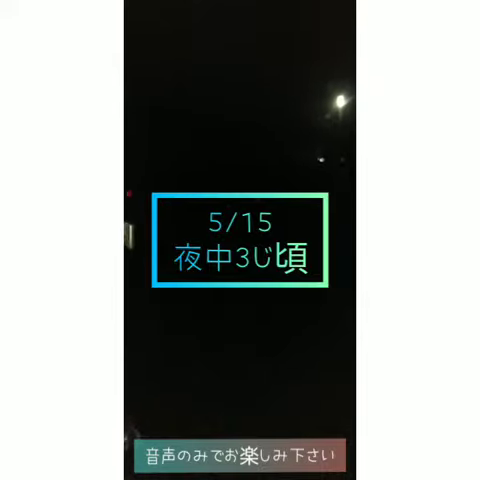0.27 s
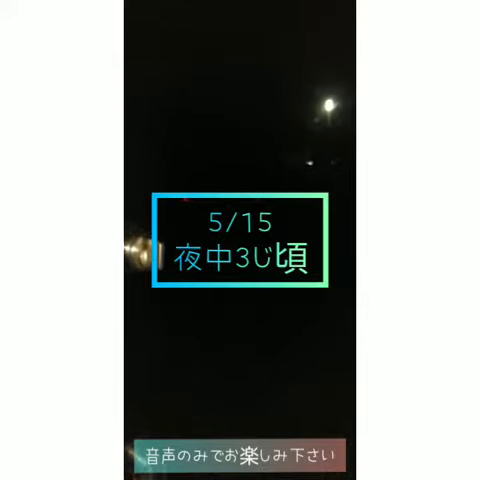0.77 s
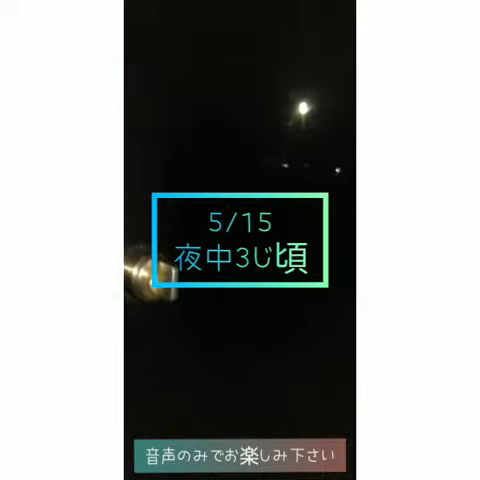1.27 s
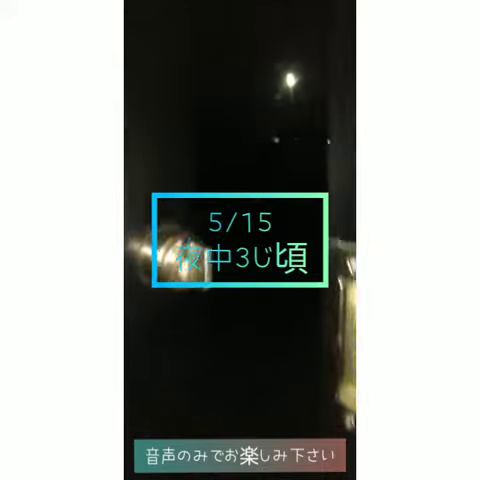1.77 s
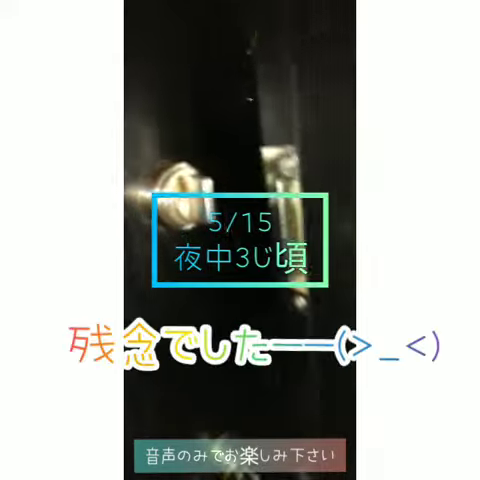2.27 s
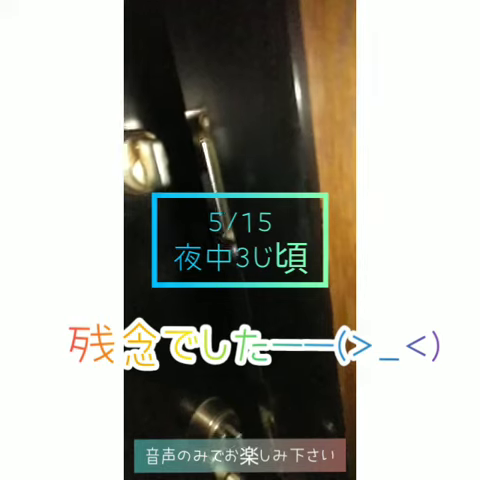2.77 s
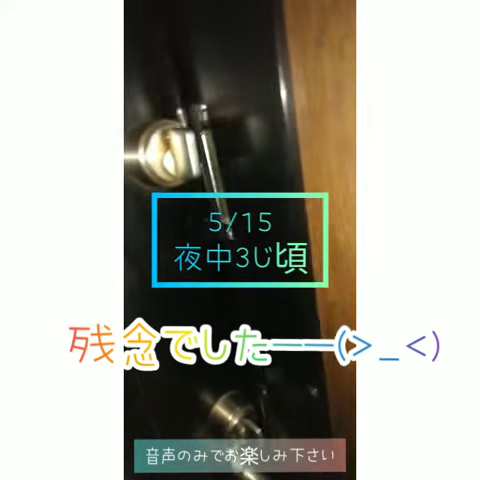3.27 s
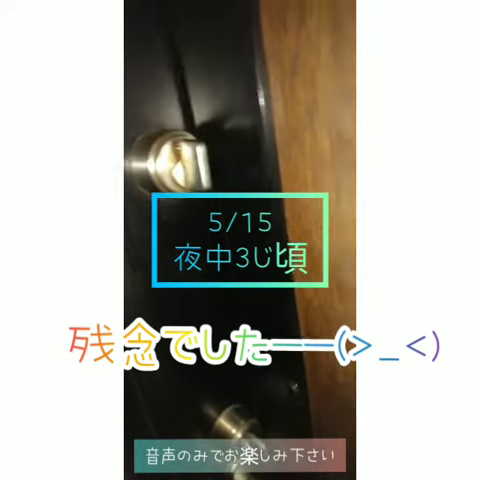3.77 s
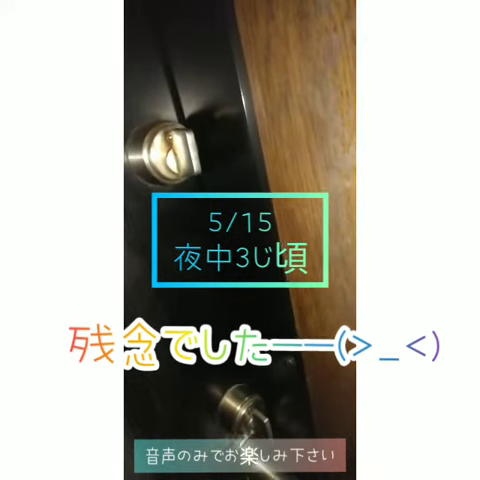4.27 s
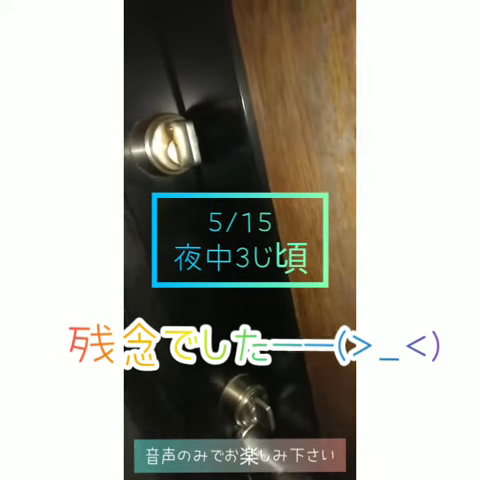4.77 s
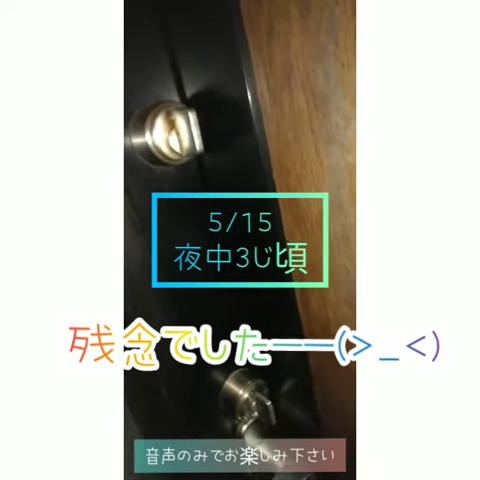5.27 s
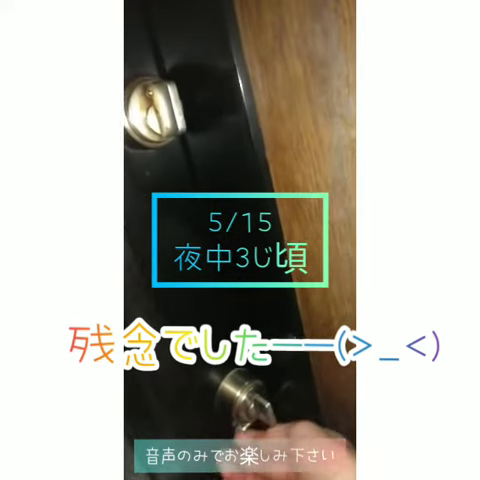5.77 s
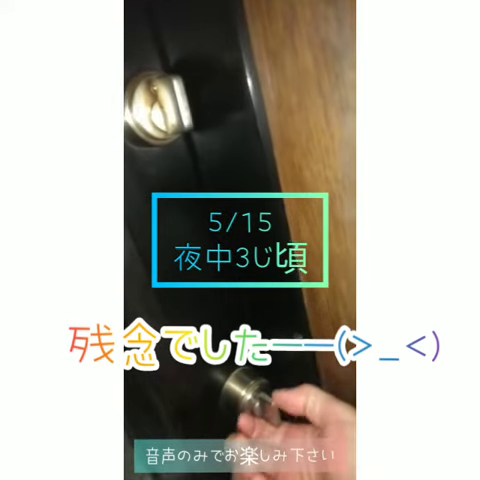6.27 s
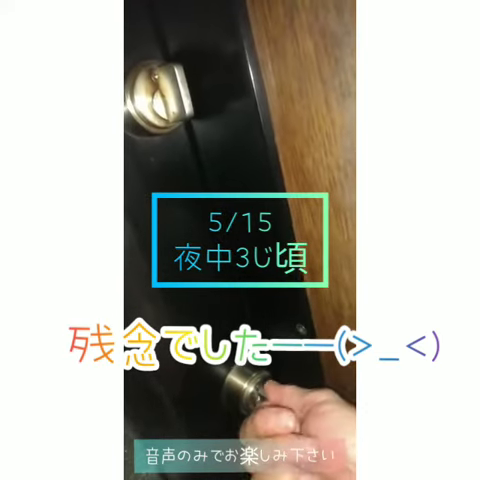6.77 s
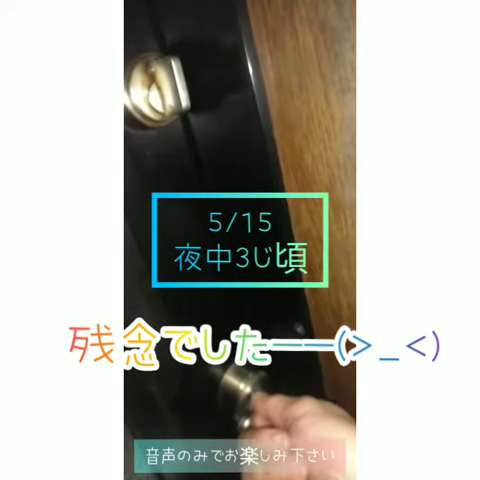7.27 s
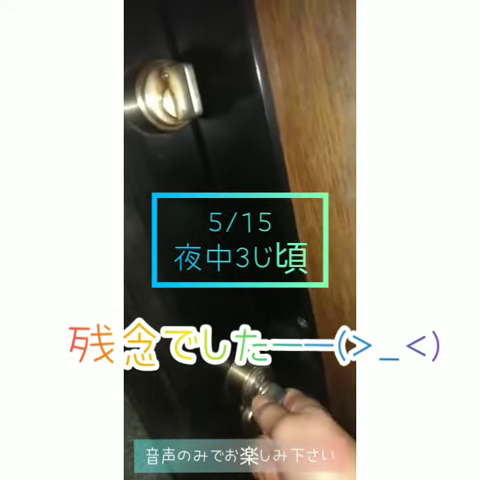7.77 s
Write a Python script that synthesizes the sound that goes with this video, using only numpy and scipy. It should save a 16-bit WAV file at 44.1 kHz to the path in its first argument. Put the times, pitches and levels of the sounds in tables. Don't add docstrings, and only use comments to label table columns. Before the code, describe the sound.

Quiet outdoor air, low rumble and thin microphone hiss fill a small hall at night, heard through a close phone. From about 0.6 to 0.9 s a swinging front door gives several light metallic snaps, with fainter ones at 1.3 and 1.5 s and a clearer latch click near 2.0 s, alongside a barely audible seal brush. The air slowly becomes muffled. After sparse tiny ticks, the leaf seats at 3.7 s with a low thud and metal clinks, then a bright latch click at 3.9 s. Lock clacks cluster around 4.5 s, with a heavier knock at 4.8 s, clicks at 5.4 and 5.7 s and a strong hollow clack at 5.9 s. Softer handling rubs and knocks continue through 6 to 7.3 s. A short thin squeak at 7.5 s precedes the sharpest metal snap at 7.7 s, then small ticks fade.

```python
import sys
import numpy as np
from scipy import signal
from scipy.fft import rfft, irfft, next_fast_len
from scipy.io import wavfile
from scipy.ndimage import uniform_filter1d, map_coordinates

SR = 44100
rng = np.random.default_rng(int(sys.argv[2]) if len(sys.argv) > 2 else 0)


def store_pcm(level_fs):
    pcm = np.round(np.clip(level_fs, -1, 1) * 32767).astype(np.int16)
    wavfile.write(sys.argv[1], SR, np.atleast_2d(pcm).T)


def ratio(d):
    e = np.asarray(d, float) / 20
    return 10 ** e


N = 354123
SPAN = 16384
TIME_S = np.arange(N) / SR
SHUT_S, SEATS_S = 2.2, 3.73
SPLIT_FROM_S, SPLIT_TO_S = 3.89, 5.69

# [t/s, level/dB]
AIR_LEVEL = [(0.0, -51.5), (0.29, -53.5), (0.89, -52.5), (1.3, -54), (1.92, -54), (3.29, -58.5),
             (3.73, -56.5), (3.91, -53), (4.11, -59), (4.79, -55), (5.68, -59), (6.06, -56.5),
             (6.37, -59.5), (7.47, -57), (7.7, -54), (8.03, -59.5)]
# [f/Hz, level/dB]
OPEN_AIR = [(150, -40), (300, -15.5), (570, 1.5), (800, -4.5), (1100, -2), (1700, -1.5), (2400, 0.5),
            (3300, -2.5), (4200, -6.5), (5100, -4), (6500, -7.5), (7600, -11.5), (11000, -21), (16000, -55)]
# [f/Hz, level/dB]
SHUT_AIR = [(150, -52), (300, -32), (620, 1.5), (900, -2), (1700, -4.5), (2500, -4.5), (3300, -7.5),
            (4000, -8.5), (5300, -9.5), (6500, -13), (7600, -16.5), (16000, -41)]
# [f/Hz, level/dB]
RUMBLE_SPECTRUM = [(13, -61), (22, -23), (59, -3), (128, -12), (156, -8), (390, -17.5), (500, -21.5),
                   (650, -85), (1100, -120)]
# [f/Hz, level/dB]
HISS_SPECTRUM = [(2500, -43), (3500, -38), (5200, -28), (7400, -25), (9000, -11.5), (11000, -9.5),
                 (14000, -8), (15600, -8), (15900, -48), (17000, -92)]
# [start t/s, end t/s, f/Hz, wander f/Hz, level/dB]
HUM_TONES = [
    (0, 8.1, 59.5, 3, -73),
    (2.1, 8.1, 748, 3, -71),
    (.4, .76, 1048, 4, -64),
]
# [f/Hz, width f/Hz, level/dB]
HALL_DRONES = [(640, 9.5, -70.5), (3140, 180, -70)]
# [f/Hz, t60/s]
HALL_DECAY = [(150, 0.35), (700, 0.26), (2000, 0.17), (5000, 0.14), (12000, 0.024)]
# [t/s, length/s, level/dB]
HAND_RUBS = [
    (1.473, 0.015, -56),
    (3.703, .03, -52),
    (3.934, 0.19, -58),
    (4.503, 0.11, -46.5),
    (4.954, 0.38, -61),
    (5.948, 0.077, -47.5),
    (6.07, 0.2, -62),
    (6.722, .14, -53),
    (7.44, 0.29, -52.5),
    (7.713, 0.34, -53),
]
# [t/s, peak level/dB, f/Hz, t60/s]
LEAF_THUDS = [(2.249, -34, 182, 0.021), (2.539, -31, 158, 0.023), (3.729, -25.5, 62.4, 0.085),
              (3.796, -33, 51, 0.35), (3.761, -27.5, 185, 0.14), (3.971, -44, 44.3, 0.74),
              (4.021, -43.5, 146, 0.12), (4.201, -42.5, 58, 0.46), (4.211, -34, 170, 0.12),
              (4.787, -18.5, 220, 0.075), (4.871, -23, 205, 0.051), (5.001, -53, 125, 0.23),
              (5.356, -30, 211, 0.24), (5.921, -33, 228, 0.11), (6.786, -38, 210, 0.25),
              (7.692, -37, 229, 0.17)]
# [t/s, peak level/dB, f/Hz, t60/s]
PART_PINGS = [(.571, -42.5, 7630, 0.031), (.736, -38, 602, .04), (.742, -39, 1420, 0.2),
              (.819, -39, 566, 0.025), (.901, -30, 650, 0.03), (1.963, -33.5, 1420, 0.089),
              (2.782, -36, 2450, 0.02), (3.7495, -24, 5250, 0.04), (3.894, -23.5, 6400, 0.028),
              (4.187, -36, 6400, 0.052), (4.504, -27, 584, 0.023), (4.526, -23, 610, 0.025),
              (4.532, -40, 4270, 0.093), (4.538, -42, 6400, 0.064), (4.595, -27, 453, 0.045),
              (4.677, -32, 530, 0.029), (4.7862, -20.5, 6300, 0.032), (5.3615, -21.5, 6350, 0.012),
              (5.38, -41, 2680, 0.17), (5.657, -22, 8470, 0.027), (5.671, -60, 8400, 0.3),
              (5.681, -36.5, 602, 0.1), (5.898, -33, 201, 0.04), (5.965, -54, 8200, .07),
              (6.7805, -26.5, 6150, 0.013), (7.609, -38.5, 1105, 0.15), (7.6792, -11.5, 6300, 0.011),
              (7.686, -23.5, 1330, 0.11), (7.709, -40.5, 2450, 0.17), (7.926, -40.5, 1136, 0.1)]
# [t/s, peak level/dB, f/Hz, t60/s]
LOOSE_CHINKS = [(.7355, -32, 3500, 0.023), (.8175, -33.5, 1770, .03), (.8185, -36, 840, .03),
                (.859, -40, 6380, .02), (.868, -41, 6380, .02), (.868, -44, 4590, .02),
                (.898, -43, 6400, .02), (.898, -41, 4600, .015), (.9, -37, 1273, 0.13),
                (3.731, -34, 2970, .03), (3.7495, -33, 9400, .03), (3.7505, -37, 6820, .03),
                (3.768, -40, 9200, .03), (3.806, -41, 2500, 0.1), (3.8895, -32, 9060, 0.016),
                (3.891, -30, 2300, .02), (3.891, -33, 1640, .04), (3.891, -33, 3280, 0.032),
                (3.893, -37, 5030, .04), (4.502, -42, 9300, .015), (4.5025, -43, 6400, 0.013),
                (4.503, -39, 3900, .015), (4.503, -35, 2010, .02), (4.507, -45, 6400, .02),
                (4.526, -29, 1880, .025), (4.5275, -35, 6400, .02), (4.5275, -41, 9200, 0.023),
                (4.535, -31, 1890, .02), (4.537, -41, 9250, .02), (4.546, -39, 6400, 0.038),
                (4.564, -42, 6500, .015), (4.57, -41, 3180, .04), (4.594, -39, 1910, .02),
                (4.7855, -27, 3000, 0.033), (4.787, -29, 2200, 0.059), (4.787, -24, 1195, 0.045),
                (4.868, -39, 6400, .012), (4.868, -31, 2900, .02), (4.875, -39, 4750, .02),
                (4.873, -40, 8970, .02)]
# [t/s, peak level/dB, f/Hz, t60/s]
LATER_CHINKS = [(5.362, -22, 2760, 0.019), (5.367, -38, 5200, .02), (5.369, -41, 6230, 0.018),
                (5.372, -35, 2750, .04), (5.364, -31, 955, .05), (5.429, -42, 1040, .04),
                (5.654, -33, 7500, 0.014), (5.656, -35, 5430, .03), (5.657, -40, 12200, .015),
                (5.662, -33, 1353, 0.057), (5.703, -50, 8400, .05), (5.911, -28, 2680, .025),
                (5.913, -28, 933, 0.15), (5.918, -28.5, 1325, 0.11), (5.937, -38, 2650, .08),
                (6.016, -29, 447, 0.017), (6.099, -47, 1900, .03), (6.099, -49, 4300, .03),
                (6.13, -36, 450, 0.023), (6.15, -39, 400, 0.028), (6.257, -44, 400, .03),
                (6.272, -44, 1340, 0.056), (6.488, -38.5, 1340, 0.044), (6.487, -37, 400, .015),
                (6.907, -33, 3030, .012), (6.79, -36, 1127, .05), (7.464, -31, 428, 0.029),
                (7.546, -27.5, 454, .02), (7.546, -33, 1810, 0.028), (7.545, -40, 7000, .015),
                (7.546, -43, 10700, .015), (7.605, -49, 10000, .02), (7.679, -25, 10240, 0.012),
                (7.68, -19, 1113, 0.054), (7.686, -29, 5150, 0.02), (7.686, -25, 6600, 0.024),
                (7.783, -44, 6400, .02)]
# [t/s, peak level/dB, f/Hz, t60/s]
FURTHER_CHINKS = [(7.679, -22, 7300, .008), (7.68, -24, 14500, .014), (7.69, -34, 400, .1),
                  (5.915, -30, 630, .1), (5.665, -36, 400, .05), (5.354, -45, 2700, .04),
                  (5.447, -42, 300, .04), (4.789, -28, 614, .06), (4.564, -34, 600, .04),
                  (4.51, -37, 900, .07), (3.897, -32, 2500, .02), (3.754, -33, 3600, .09),
                  (2.782, -42, 3600, .015), (2.782, -45, 4500, .012), (.902, -38, 800, .07),
                  (5.916, -44, 12300, .06), (4.787, -26, 150, .06), (4.789, -29, 400, .05),
                  (4.792, -30, 1100, .05), (4.872, -32, 180, .12), (4.97, -44, 1200, .03),
                  (5.119, -50, 4300, .012), (.861, -36, 1270, .05), (.818, -35, 506, .025),
                  (.952, -48, 2600, .015), (.7355, -36, 2500, .02), (2.782, -42, 1900, .015),
                  (3.06, -50, 750, .1), (5.92, -28.5, 560, .1), (3.743, -30, 400, .03), (3.76, -34, 620, .08),
                  (4.536, -33, 950, .04), (4.566, -33, 950, .05), (1.298, -44, 1250, .05),
                  (3.781, -41, 5400, .2), (7.583, -42, 655, .12), (7.468, -43, 650, .2),
                  (5.92, -26, 1190, .18)]
# [t/s, peak level/dB, lowest f/Hz, t60/s]
METAL_CRACKS = [(0.566, -42, 9150, 0.024), (.862, -44, 8000, 0.034), (1.491, -45, 4500, 0.068),
                (3.75, -50, 7500, 0.059), (3.889, -36.5, 7900, 0.02), (3.718, -52, 5000, .06),
                (4.528, -49, 7500, 0.068), (4.764, -53, 3000, 0.018), (4.564, -53, 6000, 0.025),
                (4.868, -45, 7260, 0.035), (4.992, -59, 3500, .01), (5.31, -59, 2500, .01),
                (5.448, -49, 2500, .015), (5.455, -58, 2500, .015), (5.657, -49, 7000, 0.03),
                (5.913, -44, 6100, 0.1), (6.475, -59, 2500, .015), (7.1, -46, 3000, 0.014),
                (7.19, -61, 3500, .015), (7.423, -55, 3480, .01), (7.433, -49, 5500, .03),
                (7.453, -47, 6000, 0.022), (7.544, -44, 6000, 0.066), (7.606, -53, 7500, .03),
                (7.6785, -19, 8300, 0.015), (7.684, -50.5, 7000, 0.23), (7.778, -44, 5500, 0.034)]
# [peak t/s, f/Hz, peak level/dB, swell/s]
SPINDLE_SLIPS = [
    (7.49, 3440, -45.5, 0.016),
    (7.531, 3464, -45.5, .025),
    (7.553, 2830, -35, .007),
    (7.563, 2770, -34, .011),
    (7.581, 2730, -43, .006),
    (7.589, 2720, -39.5, 0.0061),
    (7.62, 2790, -55, 0.036),
]
# [f/Hz, width f/Hz, level/dB]
LEAF_MODES = [(170, 52, -4.5), (211, 34, 3), (340, 320, -12.5), (456, 73, 1.5), (530, 97, -3),
              (637, 24, 2.5), (413, 210, -10)]
# [f/Hz, width f/Hz, level/dB]
PLATE_MODES = [(934, 320, -8), (1105, 185, -1), (1105, 92, 5), (1330, 38, 3), (1435, 440, -7.5),
               (1784, 52, -8.5), (1238, 112, -21)]
# [f/Hz, width f/Hz, level/dB]
LATCH_MODES = [(1740, 880, 3), (2170, 660, 10.5), (2500, 520, 6.5), (2865, 27, 14), (2940, 680, -7),
               (3630, 270, -23), (2830, 490, 4.5)]
# [f/Hz, width f/Hz, level/dB]
KNOB_MODES = [(4470, 120, -20), (5180, 930, 15), (5580, 330, 11), (6400, 990, 8.5), (7000, 260, 11),
              (5040, 5300, -2)]
# [t/s, plate level/dB, leaf, latch, knob level/dB re plate]
SWING_SNAPS = [
    (0.735, -39, -8, 0, -8.5),
    (0.818, -44, -7, -1, -18),
    (0.899, -44, -4, -5, -16),
    (1.3, -49, -21, -4, -6),
    (1.312, -52, -13, 0, 1.5),
    (1.489, -44.5, 0.5, -19, 5.5),
    (1.54, -50, -15, -2, -17),
    (1.653, -48, -11, -6, -25),
    (1.961, -40.5, -12.5, 5, -5),
]
# [t/s, plate level/dB, leaf, latch, knob level/dB re plate]
LOCK_SNAPS = [(3.89, -42.5, -2.5, 10, 1.5), (4.526, -39.5, -20, -12, -8), (4.537, -40, 0.5, -8, -9),
              (4.564, -48.5, 11, 0, -6), (4.786, -33, -4, 0, -12), (4.867, -46.5, 9, 6.5, 0),
              (5.348, -55, 15, -14, -24), (5.36, -43.5, 12, -5, -4), (5.371, -45, -4, -10, -12),
              (5.912, -27.5, -3, -5, -29), (6.015, -48.5, 4.5, -21, -14), (6.262, -51.5, 0.5, -3, -13),
              (6.487, -44, -5.5, -6, -26), (6.782, -39.5, 2.5, -3.5, -16), (6.907, -46, -0.5, -2.5, -9),
              (7.264, -47.5, -16, -3, -13), (7.464, -47.5, 4.5, -16, -11), (7.6795, -27.5, -7.5, -11, -10),
              (7.78, -44.5, -3, -8, -9), (7.921, -47, -3, -2, -6)]
# [t/s, plate level/dB, leaf, latch, knob level/dB re plate]
LONG_SCRAPES = [(0.861, -40, -7, -7.5, -12), (1.498, -45.5, -18, 2.5, 5.5), (3.73, -38.5, 0, 0, -11),
                (3.749, -41.5, -8, 5.5, 7), (3.769, -40, -1.5, 1, -1.5), (3.792, -52, -3, 5, -3),
                (4.186, -56, 6, -1, 2), (4.502, -42.5, -3, -3, -17), (4.593, -53.5, 10, -2, -14),
                (5.657, -45, 5.5, 0, 0.5), (5.917, -30.5, -12, -12, -28), (7.525, -50, -3, -1, -4),
                (7.546, -46.5, 1.5, 2, -20), (7.606, -53, 2, -1, -25)]
# [t/s, plate level/dB]
HAND_BUMPS = [(2.249, -75), (2.538, -68), (3.056, -68), (3.97, -56.5), (4.01, -56.5), (4.213, -57),
              (4.678, -54.5), (4.97, -58), (5.709, -69), (5.824, -67), (6.101, -54.5), (6.142, -54),
              (6.565, -54.5), (6.594, -54), (6.746, -68), (6.819, -55), (7.332, -65), (8, -62)]
# [t/s, plate level/dB]
LATCH_TICKS = [(0.159, -75), (0.445, -64), (0.567, -56), (2.465, -67), (2.7815, -63), (3.199, -69),
               (3.507, -57.5), (3.686, -65), (4.091, -62), (5.118, -72), (5.431, -67), (5.779, -69),
               (6.459, -67), (6.683, -69), (7.221, -68), (7.288, -62.5), (7.438, -62.5), (7.895, -67)]


def unit(x):
    return x / np.sqrt(np.mean(x ** 2) + 1e-20)


def along(points, f_hz):
    point_hz, value = np.transpose(points)
    return np.interp(np.log(f_hz + 1), np.log(point_hz + 1), value)


def wobble(rate_hz):
    knots = rng.standard_normal(int(N * 40 / SR))[:int(N * rate_hz / SR) + 4]
    return map_coordinates(knots, [np.arange(N) * rate_hz / SR])


def noise(gain):
    m = next_fast_len(N)
    spectrum = rfft(rng.standard_normal(m)) * gain(np.fft.rfftfreq(m, 1 / SR))
    return unit(irfft(spectrum, m)[:N])


def add(track, t_s, sound):
    part = track[round(t_s * SR):][:len(sound)]
    part += sound[:len(part)]


def blur(spectrum, size):
    power = uniform_filter1d(np.abs(spectrum) ** 2, size=size)
    return np.sqrt(np.abs(power) + 1e-20)


def responses(modes):
    f = np.fft.rfftfreq(SPAN, 1 / SR)
    soft = 1 / (1 + 1j * f / (1.72 * max(modes)[0])) ** 3
    rows = []
    for k, (mode_hz, width_hz, db) in enumerate(modes):
        damping = 1j * f * width_hz
        resonance = damping / (mode_hz * mode_hz - f * f + damping)
        rows.append((-1) ** k * ratio(db) * soft * resonance)
    return np.array(rows)


def night_air(air_db, shut):
    free = noise(lambda f: ratio(along(OPEN_AIR, f)))
    muffled = noise(lambda f: ratio(along(SHUT_AIR, f)))
    gust_db = 0.8 * wobble(9.6)
    return ratio(air_db - 2.5 + gust_db) * (np.sqrt(1 - shut) * free + np.sqrt(shut) * muffled)


def rumble(air_db, shut):
    follow, air_mean_db, shudder_db, shudder_s = 0.58, -57.5, 9.5, 0.57
    since_s = TIME_S - SEATS_S
    level_db = -63.5 + follow * shut * (air_db - air_mean_db)
    level_db += shudder_db * (since_s > 0) * np.exp(-np.abs(since_s) / shudder_s)
    return ratio(level_db + 3.0 + 0.77 * wobble(3.98)) * noise(lambda f: ratio(along(RUMBLE_SPECTRUM, f)))


def microphone_hiss():
    ducked = np.clip(np.minimum(TIME_S - SPLIT_FROM_S, SPLIT_TO_S + .2 - TIME_S) / .1, 0, 1)
    return ratio(-68 - 1.5 * ducked) * noise(lambda f: ratio(along(HISS_SPECTRUM, f)))


def hums(shut):
    out = np.zeros(N)
    for start_s, end_s, f_hz, wander_hz, db in HUM_TONES:
        fade = np.clip(np.minimum(TIME_S - start_s, end_s - TIME_S) / .1, 0, 1)
        level = ratio(db + 2.2 * wobble(9)) * fade
        phase = np.cumsum(2 * np.pi * (f_hz + wander_hz * wobble(25)) / SR)
        out += level * np.sin(phase)
    for f_hz, width_hz, db in HALL_DRONES:
        out += ratio(db) * shut * noise(lambda f: 1 / (1 + ((f - f_hz) / width_hz) ** 2))
    return out


def background():
    air_db = np.interp(TIME_S, *np.transpose(AIR_LEVEL))
    shut = np.clip((TIME_S - SHUT_S) / 2.0, 0, 1)
    return night_air(air_db, shut) + rumble(air_db, shut) + microphone_hiss() + hums(shut)


def sweep():
    swell = np.exp(-((TIME_S - 1.92) / 0.25) ** 2)
    return ratio(-67.0) * swell * noise(lambda f: 1 / (1 + ((f - 11500) / 2600) ** 4))


def rubbing():
    grains_per_s, spread_db = 900, 3.5
    level = np.zeros(N)
    for t_s, length_s, db in HAND_RUBS:
        level += ratio(db) * np.sin(np.pi * np.clip((TIME_S - t_s) / length_s, 0, 1)) ** 0.66
    hits = rng.random(N) < grains_per_s / SR
    slips = hits * rng.standard_normal(N) * ratio(spread_db * rng.standard_normal(N))
    answer = responses(PLATE_MODES).sum(axis=0)
    answer = answer + ratio(4.5) * responses(LEAF_MODES[3:]).sum(axis=0)
    answer = answer + ratio(-19.5) * responses(LATCH_MODES).sum(axis=0)
    body = irfft(answer)[:SPAN // 4]
    return signal.fftconvolve(level * unit(slips), body / np.linalg.norm(body))[:N]


def ringing(table, rise_s, drift, flutter_db, stutter_db=0, size=SPAN):
    track, t = np.zeros(N), np.arange(size) / SR
    for t_s, db, f_hz, t60_s in table:
        chance = rng.standard_normal(size)
        phase = 2 * np.pi * f_hz * t + drift * np.sqrt(f_hz) * np.cumsum(chance)
        loose = unit(uniform_filter1d(uniform_filter1d(chance[::-1], size=130), size=130))
        loose = loose * np.clip(t / .01, 0, 1)
        level = ratio(db - 60 * t / t60_s + stutter_db * loose)
        envelope = (1 - np.exp(-t / rise_s)) * (1 - t / t[-1])
        add(track, t_s, level * envelope * np.sin(phase))
    return track * ratio(flutter_db * wobble(38))


def thuds():
    return ringing(LEAF_THUDS, rise_s=.003, drift=.0015, flutter_db=1.5)


def pings():
    return ringing(PART_PINGS, rise_s=.0012, drift=.0019, flutter_db=1.5, stutter_db=4)


def chinks():
    table = LOOSE_CHINKS + LATER_CHINKS + FURTHER_CHINKS
    return ringing(table, rise_s=.0008, drift=.0025, flutter_db=0, stutter_db=3, size=SPAN // 4)


def cracks():
    track, t = np.zeros(N), np.arange(SPAN // 2) / SR
    for t_s, db, low_hz, t60_s in METAL_CRACKS:
        high_hz = min(1.5 * low_hz, 16000)
        band = signal.butter(2, [low_hz, high_hz], "band", fs=SR, output="sos")
        burst = unit(signal.sosfilt(band, rng.standard_normal(len(t))))
        add(track, t_s, ratio(db - 60 * t / t60_s) * (1 - np.exp(-t / 0.0021)) * burst)
    return track


def squeak():
    grip_from_s, grip_to_s = 7.468, 7.592
    swell_db, sag = 13, 0.016
    second_db, third_db = -64, -66
    trail_db, trail_t60_s = -60, .3
    peak_s, slip_hz, slip_db, swell_s = np.transpose(SPINDLE_SLIPS)[:, :, None]
    t = np.arange(round(.3 * SR)) / SR + grip_from_s - .02
    u = (t - peak_s) / swell_s
    level_db = slip_db - swell_db * np.abs(u) ** 1.32
    slip = level_db.argmax(axis=0)
    now = slip, np.arange(len(t))
    grit = rng.standard_normal(len(t))
    pitch_hz = (slip_hz * (1 - sag * np.clip(u, 0, 1)))[now]
    phase = np.cumsum(2 * np.pi * pitch_hz / SR + .02 * grit)
    flutter_db = unit(uniform_filter1d(uniform_filter1d(grit, size=200), size=200))
    grip = ratio(4 * flutter_db) * np.clip(np.minimum(t - grip_from_s, grip_to_s - t) / .008, 0, 1)
    tone = ratio(level_db[now] - 2 * flutter_db) * np.sin(phase)
    tone += grip * ratio(second_db) * (slip < 2) * np.sin(2 * phase)
    tone += grip * ratio(third_db) * np.sin(3 * phase)
    trail = ratio(trail_db - 60 * np.abs(t - peak_s[1]) / trail_t60_s + 3 * flutter_db)
    trail_phase = 2 * np.pi * slip_hz[1] * t + 0.029 * np.cumsum(grit)
    tone += (u[1] > 0) * trail * np.sin(trail_phase)
    track = np.zeros(N)
    add(track, t[0], np.sqrt(2) * tone)
    return track


def hall():
    f_hz, t, z = signal.stft(rng.standard_normal(SPAN), SR, nperseg=256)
    decay_db = -60 * t / along(HALL_DECAY, f_hz)[:, None]
    tail = signal.istft(z * ratio(decay_db), SR, nperseg=256)[1][:SPAN]
    return np.roll(tail, 150) / np.linalg.norm(tail)


def contacts():
    snaps = [(*row, 3.52) for row in SWING_SNAPS + LOCK_SNAPS]
    scrapes = [(*row, 9) for row in LONG_SCRAPES]
    bumps = [(*row, 6, -3, -7.5, 7.5) for row in HAND_BUMPS]
    ticks = [(*row, -17, 9, 4.5, 5.5) for row in LATCH_TICKS]
    return snaps + scrapes + bumps + ticks


def chatter(length_s):
    t = np.arange(SPAN) / SR
    grit = rng.standard_normal(SPAN) * np.exp(0.66 * rng.standard_normal(SPAN))
    force = rfft(grit * np.exp(-t / length_s) * (1 - np.exp(-t / (0.12 * length_s))))
    return force / blur(force, size=160)


def struck(part, force, scatter_db):
    mode_gains = ratio(scatter_db * rng.standard_normal(len(part)))
    sound = irfft(force * (mode_gains @ part))
    return sound / np.sqrt(uniform_filter1d(sound[:SPAN // 4] ** 2, size=176).max())


def hardware():
    track, t, f = np.zeros(N), np.arange(SPAN) / SR, np.fft.rfftfreq(SPAN, 1 / SR)
    plate, leaf = responses(PLATE_MODES), responses(LEAF_MODES)
    latch, knob = responses(LATCH_MODES), responses(KNOB_MODES)
    thin = (1j * f / (1j * f + 300)) ** 4
    for t_s, plate_db, leaf_db, latch_db, knob_db, chatter_ms in contacts():
        force = chatter(chatter_ms / 1000) * (thin if t_s < SHUT_S else 1)
        direct = struck(plate, force, scatter_db=2.5)
        direct = direct + ratio(leaf_db) * struck(leaf, force, scatter_db=2.5)
        direct = direct + ratio(latch_db) * struck(latch, force, scatter_db=3.5)
        direct = direct + ratio(knob_db) * struck(knob, force, scatter_db=6)
        colour = blur(rfft(direct), size=90) * f ** 2 / (f ** 2 + 110 ** 2)
        wet = irfft(colour * rfft(hall(), SPAN)) * (1 - np.exp(-t / 0.0055))
        sound = ratio(plate_db) * (direct + ratio(-4.5) * wet)
        add(track, t_s - .0008, sound[:-SPAN // 8])
    return track


def scene():
    ringing_parts = pings() + thuds()
    mono = hardware() + ringing_parts + squeak() + cracks() + sweep() + background() + rubbing() + chinks()
    return np.array([mono, mono])


def patchy(x):
    f_hz, t, z = signal.stft(x, SR, nperseg=512)
    field = uniform_filter1d(rng.standard_normal(z.shape[1:]), size=14, axis=0)
    field = unit(uniform_filter1d(field, size=22, axis=1))
    treble = np.exp(-((f_hz - 8300) / 2200) ** 2)
    active = np.outer(treble, (t > SPLIT_FROM_S) & (t < SPLIT_TO_S))
    quiet = np.abs(z) < 2 * np.median(np.abs(z), axis=-1, keepdims=True)
    cut_db = -3 * np.clip(field + .5, 0, 2) * active * quiet
    return signal.istft(z * ratio(cut_db), SR, nperseg=512)[1][:, :N]


def channel_difference(mono):
    treble = signal.butter(10, 4600, "high", fs=SR, output="sos")
    smear = unit(uniform_filter1d(rng.standard_normal(N), size=24))
    side = signal.sosfilt(treble, signal.sosfilt(treble, mono) * smear)
    return side * ((TIME_S > SPLIT_FROM_S) & (TIME_S < SPLIT_TO_S))


def low_pass(x):
    return signal.sosfilt(signal.butter(12, 17150, fs=SR, output="sos"), x)


def record(dry):
    side = channel_difference(dry[0])
    low_cut = signal.butter(4, 38, "high", fs=SR, output="sos")
    high_cut = signal.ellip(10, .1, 26, 15850, fs=SR, output="sos")
    stereo = patchy(dry) + ratio(-12) * np.array([side, -side])
    mix = signal.sosfilt(np.vstack([low_cut, high_cut]), stereo)
    return low_pass(mix)


dry = scene()
out = record(dry)
store_pcm(out)
```